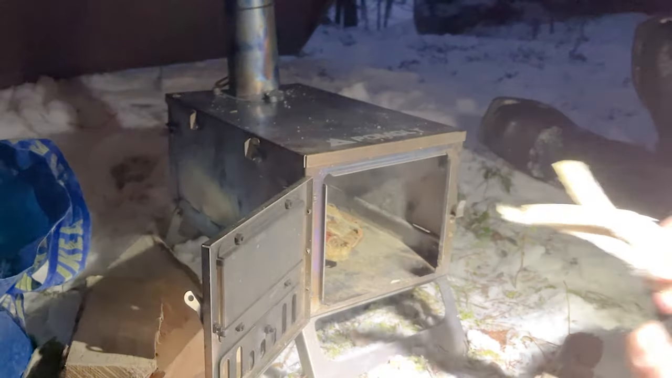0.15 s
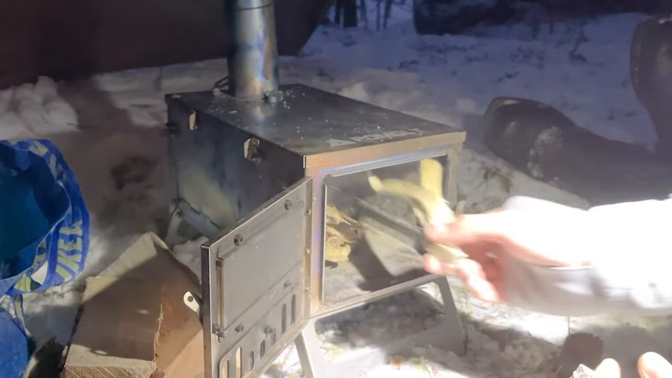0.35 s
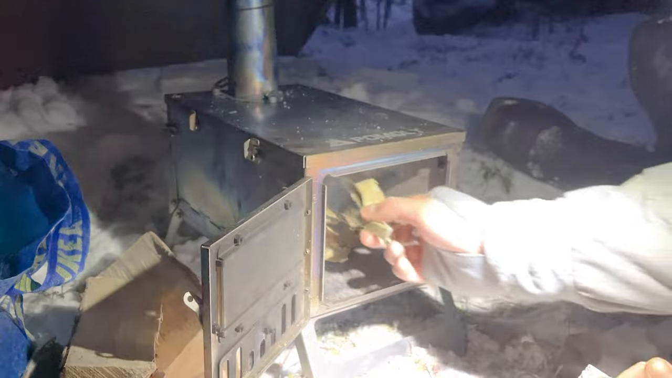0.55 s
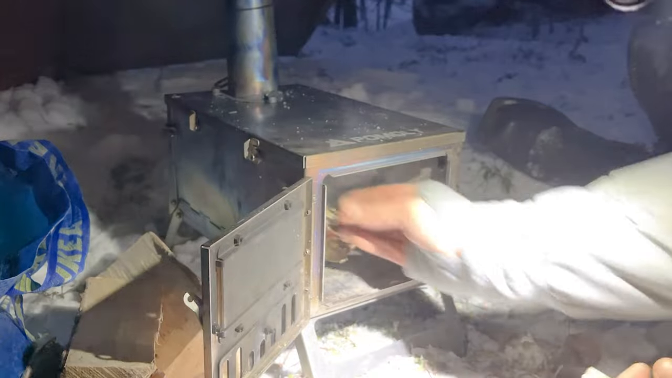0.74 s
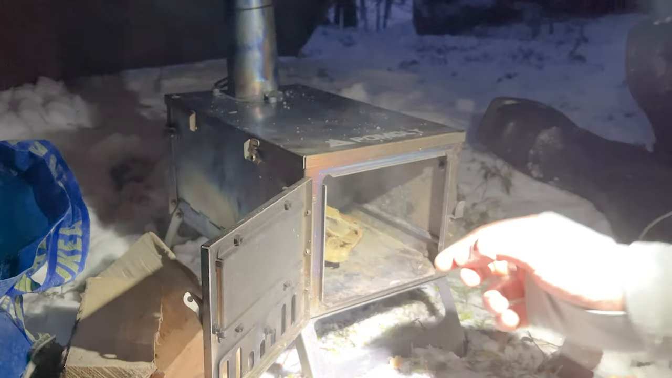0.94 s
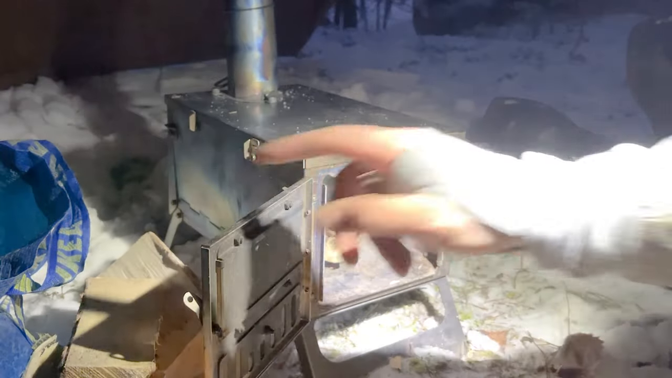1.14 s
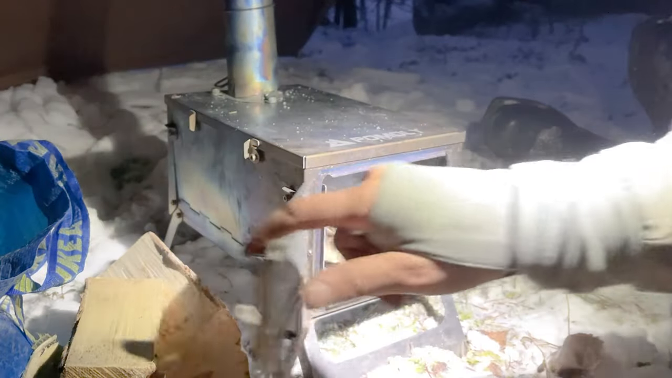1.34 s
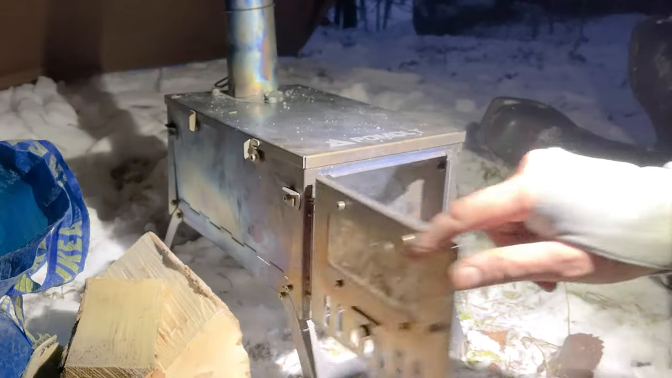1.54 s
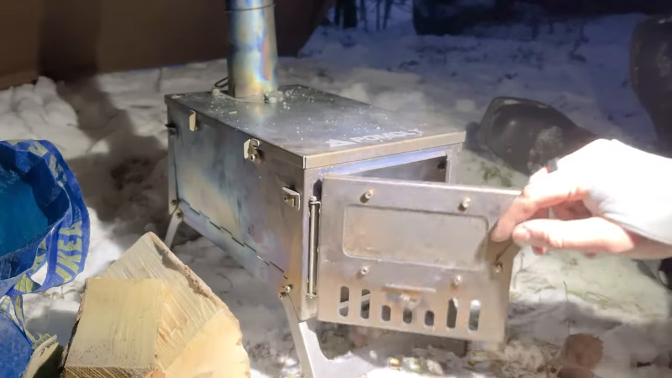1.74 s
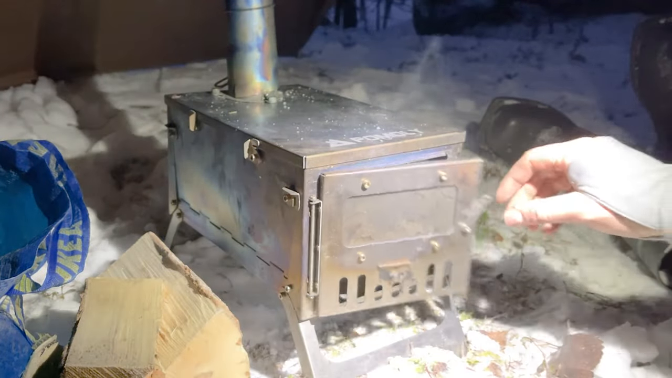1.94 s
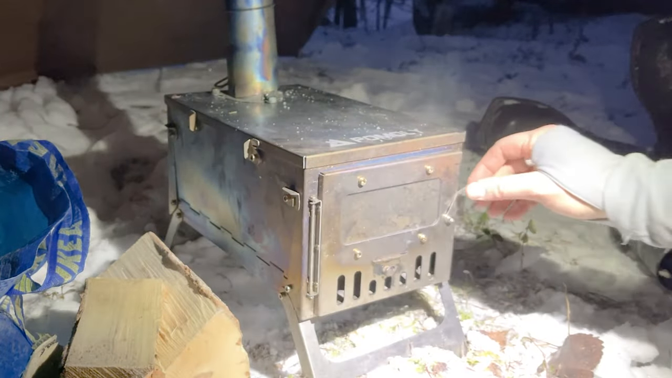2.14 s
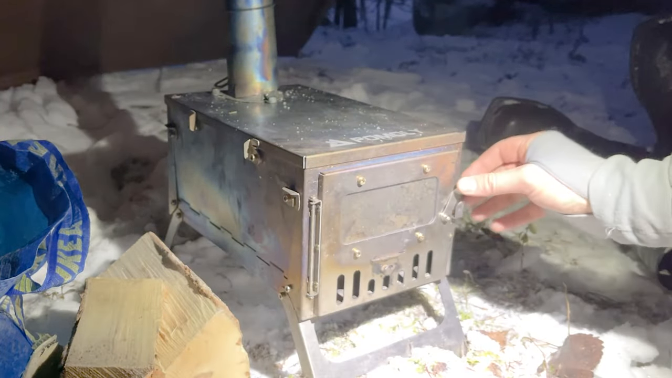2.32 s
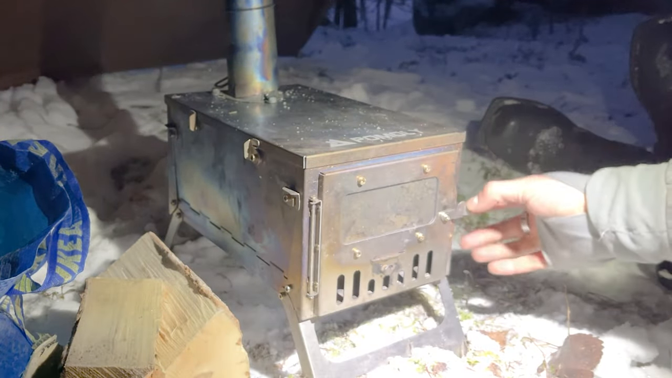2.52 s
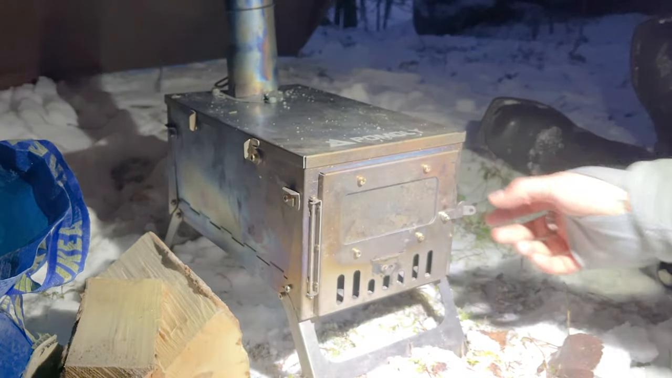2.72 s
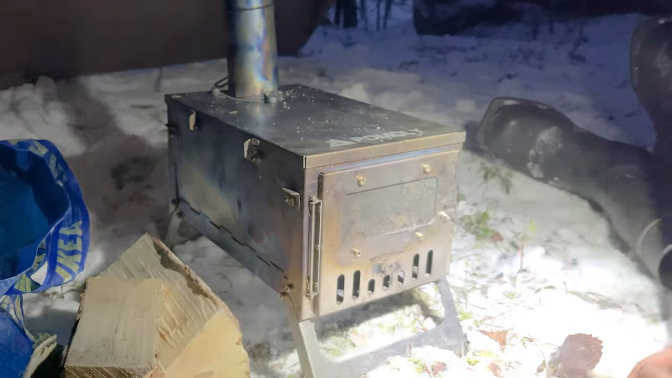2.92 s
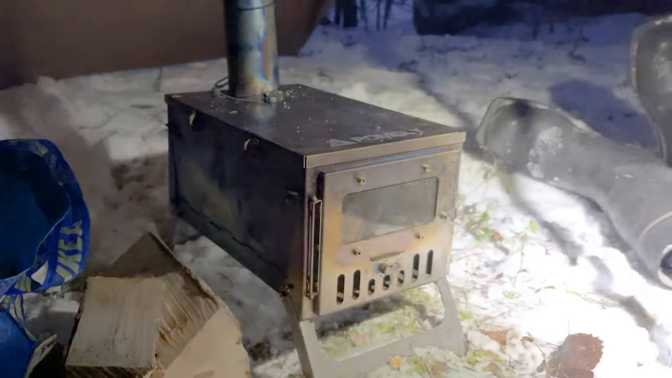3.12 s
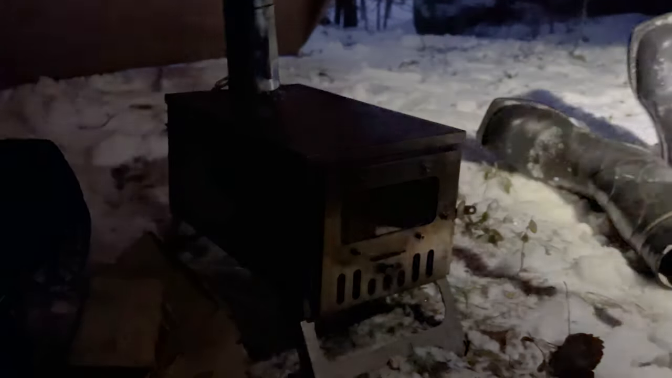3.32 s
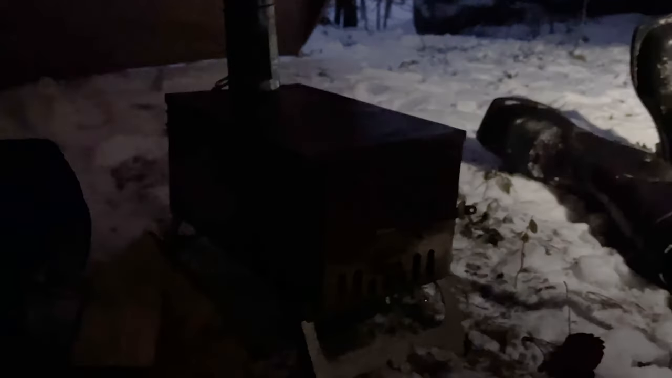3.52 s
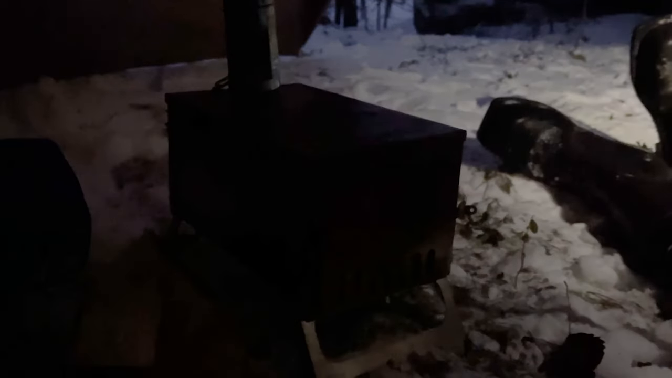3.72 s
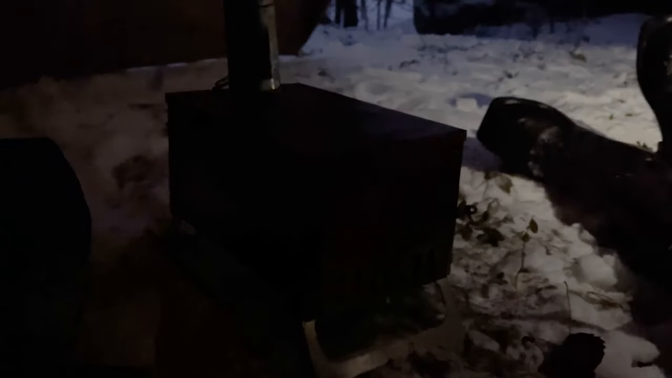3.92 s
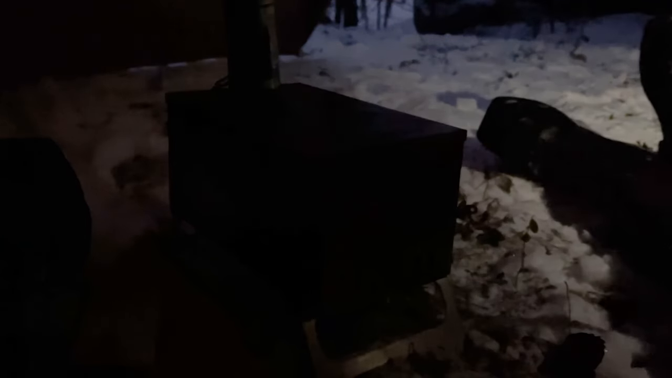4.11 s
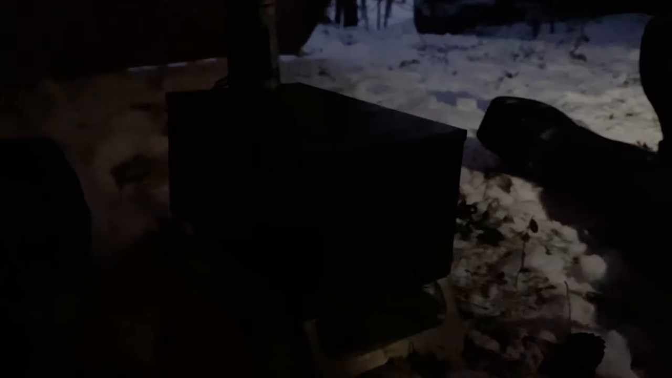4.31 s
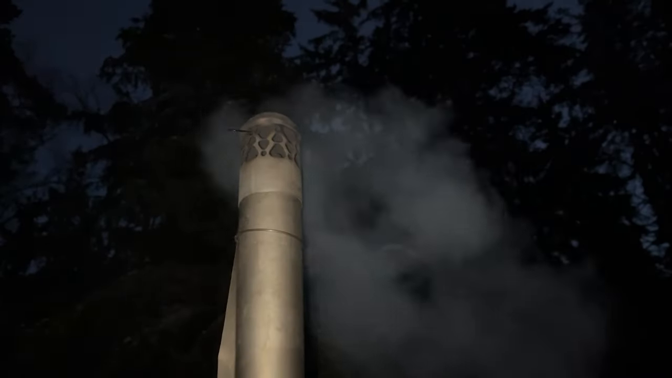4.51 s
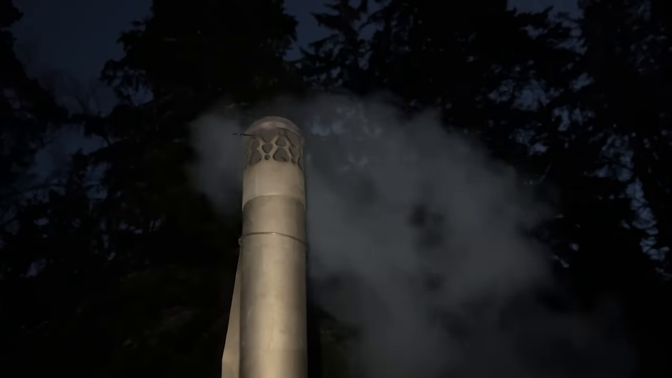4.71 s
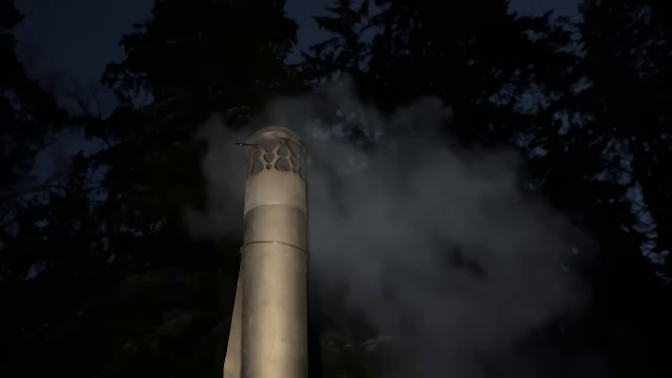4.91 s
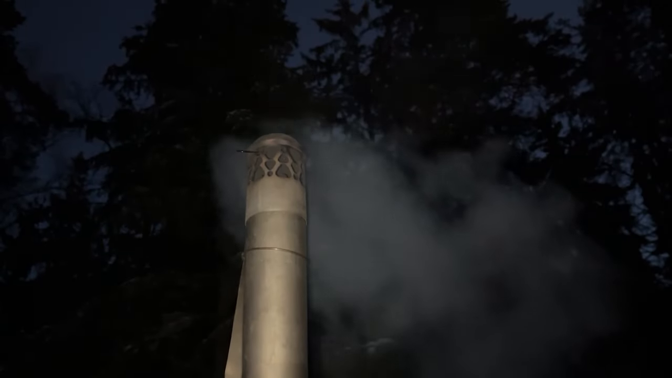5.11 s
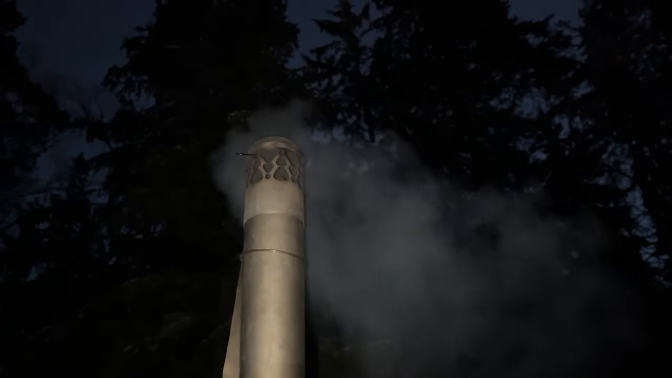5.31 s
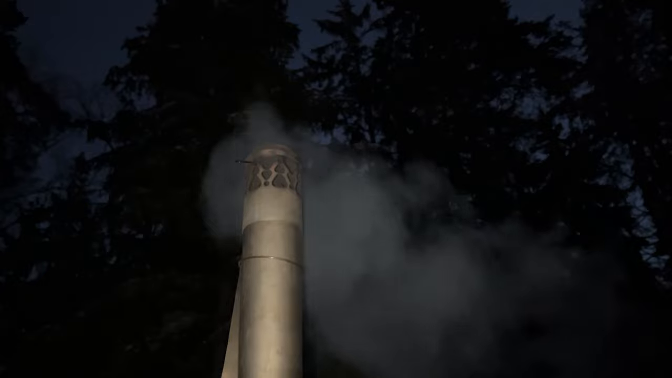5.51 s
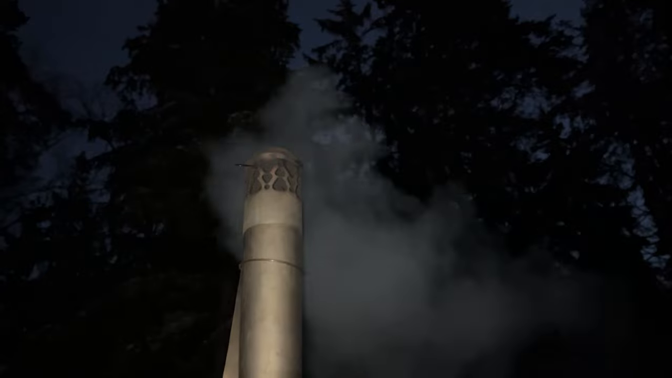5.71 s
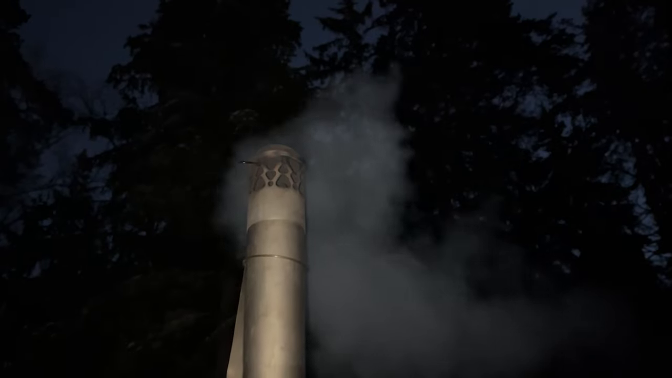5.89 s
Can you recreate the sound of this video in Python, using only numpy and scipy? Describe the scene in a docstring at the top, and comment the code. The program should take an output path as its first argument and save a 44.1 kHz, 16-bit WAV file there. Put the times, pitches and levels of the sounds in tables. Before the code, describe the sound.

Light wood knocks, a loud ringing thin-metal door slam with latch clanks, a dry crack, dull bumps, then low airy rumbling and faint pops.

```python
"""Inside a tent, then outdoors by the flue: a small sheet-steel stove heard on two close microphone ports.
Kindling lands in the firebox and the door is swung shut and latched: contact ticks, ringing steel modes, boom.
Squeaks, sleeves and scuffs are grainy shaped noise, wood snaps are noise bursts, soft thuds are falling chirps.
Behind them lie a faint hiss, a whistle and murmuring air; outdoors the flue rumbles as flickering noise,
the air buffets slowly and the fire pops twice."""
import sys
import numpy as np
from scipy import signal
from scipy.fft import rfft, irfft
from scipy.io import wavfile
from scipy.ndimage import uniform_filter1d

SR = 44100
rng = np.random.default_rng(int(sys.argv[2]) if len(sys.argv) > 2 else 0)


def master_out(mix):
    """Clip the mix to full scale and print it as 16-bit PCM to the path in sys.argv[1]."""
    frames = np.transpose(np.atleast_2d(mix))
    ceiling = np.clip(frames, -1, 1)
    pcm = np.round(ceiling * 32767).astype(np.int16)
    wavfile.write(sys.argv[1], SR, pcm)


N = 262395
TIME = np.arange(N) / SR  # s
HZ = np.fft.rfftfreq(N, 1 / SR)
RING = np.arange(SR // 3) / SR  # time within one short sound, s
SHARED_ONLY = np.array([[1], [0]])  # a long wave reaches the two ports alike: it has no unrelated part

# blows on door and latch: (time [s], clang [dB], panel boom [dB], time to the rebound [s])
DOOR_BLOWS = [(1.2399, -31.5, -32, 0.0097), (1.2581, -31.5, -31, .016), (1.281, -33, -40, .012),
              (1.709, -50.5, -42, .013), (1.728, -60.5, -38, .014), (1.804, -46, -57, 0.0057),
              (1.911, -47.5, -36, .014), (2.0387, -12.5, -19, .0163), (2.2196, -21, -21, 0.01),
              (2.4375, -31, -55, .0137), (2.445, -23, -22, .0066), (2.4988, -32.5, -30.5, 0.0056),
              (2.628, -63, -64, 0.0077)]
# steel sliding on steel at handle and latch:
# (start [s], length [s], clang [dB], boom [dB], treble corner [Hz])
SLIDES = [(1.261, .038, -53, -48, 8900), (1.30, .06, -66, -48.5, 1400), (1.918, .116, -44, -40.5, 2100),
          (2.427, .021, -46, -66, 13100)]
# ringing modes of the door: (frequency [Hz], level [dB], t60 [s])
DOOR_MODES = [(169, -15.5, .15), (197, -7.5, 0.17), (238.3, 0, 0.13), (293, 2.5, .14), (322, -7.5, 0.17),
              (378.2, -9.5, 0.18), (489.8, -17.5, 0.11), (545, -23.5, .18), (966, -13, 0.15),
              (1099, -10, .2), (1443, -13.5, .12), (1802, -8, 0.11), (1980, -14, .12), (2307, -5, 0.054),
              (2495, -12.5, .1), (2902, -12, .09), (3704, -15, .09), (4087, -1.5, 0.058),
              (4150, -5.5, 0.064), (4270, -5.5, .07), (6250, -4, 0.062), (7200, -9.5, 0.052),
              (8800, -5.5, .05), (12425, -5, 0.025)]
# kindling landing on the firebox floor: (time [s], clang [dB], panel boom [dB], treble corner [Hz])
WOOD_BLOWS = [(.088, -50.5, -68, 2030), (.145, -54, -59.5, 2170), (.374, -45.5, -42, 1630),
              (0.6345, -29.5, -28.5, 2780), (.746, -39.5, -31, 1530), (.765, -39, -32, 1800),
              (.785, -42, -34.5, 1660)]
# a stick touches with one end, lands, then tips over: (delay [s], clang change [dB], boom change [dB])
STICK_CONTACTS = [(-.0113, -12.5, -14), (0, 0.5, 0.5), (.027, -12.5, -16)]
# ringing modes of the firebox floor: (frequency [Hz], level [dB], t60 [s])
FLOOR_MODES = [(287.2, 4, 0.11), (334, 0, 0.097), (387.8, -6.5, 0.21), (472.3, -15, 0.21), (644, -22, 0.25),
               (874, -14.5, 0.28), (1095, -10.5, 0.12), (1238, -5.5, 0.08), (1429, -12, 0.26),
               (1770, -11.5, 0.19), (2120, -10, 0.12), (2325, -6, 0.12), (2780, -4, 0.074),
               (3230, 1.5, 0.085)]
# dense upper modes of the sheet steel: (frequency [Hz], relative density [dB per Hz])
SHEET_COLOUR = [(30, -25), (80, -4), (200, 1.5), (400, 3), (700, 0), (1100, 0), (2000, 3), (3500, 2),
                (5000, 2), (7000, 7), (12000, 8), (16000, -10.5)]
# how long those modes ring: (frequency [Hz], t60 [s])
SHEET_T60 = [(150, 0.23), (400, 0.19), (1040, 0.19), (2760, 0.11), (7280, 0.07), (14000, .06)]
# squeaks of hinge and latch: (peak time [s], low note [dB], high note [dB], rise [s], fall [s])
SQUEAKS = [(1.702, -68, -73, 0.01, 0.015), (1.803, -56.5, -61, 0.011, 0.0081),
           (2.634, -90, -68, 0.0045, 0.017)]
# their low note: (frequency [Hz], relative density [dB per Hz])
SQUEAK_LOW = [(1100, -42), (1500, 5), (1630, -12), (1800, 0), (2100, -25), (2450, -11), (3000, -38)]
# their high note: (frequency [Hz], relative density [dB per Hz])
SQUEAK_HIGH = [(3000, -42), (3500, -11), (3700, -2), (3950, -19), (4800, -32)]
# dry snaps of the wood, the last row the sharp crack of the first pop: (time [s], level [dB], t60 of the
# scatter [s])
SNAPS = [(2.820, -60, 0.045), (2.866, -63.5, 0.043), (2.9864, -45, 0.051), (3.5246, -30, 0.067),
         (4.869, -70, 0.027), (5.7882, -60, 0.019)]
# colour of a snap: (frequency [Hz], density [dB per Hz])
SNAP_COLOUR = [(100, -13), (700, -18.5), (1050, 2), (1450, 2.5), (2000, 2), (3500, 5.5), (5000, -1.5),
               (6500, -1), (9000, -2.5), (13000, -8), (16000, -27)]
# pops of the fire heard at the flue: (time [s], peak level [dB])
POPS = [(5.7861, -35), (5.864, -30)]
# colour of a pop before its shift in pitch: (frequency [Hz], relative level [dB])
POP_COLOUR = [(30, -14), (95, 10), (300, -0.5), (550, -2), (700, -8.5), (820, 0), (1150, 1.5),
              (1500, -15.5), (1750, -5.5), (2200, -20), (3000, -23), (5000, -44), (14000, -54)]
# dull thuds: (time [s], peak level [dB], pitch [Hz])
THUDS = [(1.240, -38, 165), (1.254, -38.5, 160), (2.896, -34.5, 293), (4.076, -32.5, 205),
         (4.110, -35.5, 196), (4.135, -40, 170), (4.183, -28, 181.7)]
# their shared colour, as it stands at a pitch of THUD_HZ: (frequency [Hz], relative level [dB])
THUD_COLOUR = [(12, -70), (45, -32), (100, -1.5), (190, 1.5), (300, -5), (450, -26), (560, -19.5),
               (800, -41), (1000, -34), (1500, -50), (4000, -53)]
# strokes of a sleeve: (peak time [s], rub [dB], sheen [dB], rise [s], fall [s])
SWISHES = [(.0076, -73, -44.5, 0.0022, 0.013), (.78, -56.5, -60, 0.1, 0.057),
           (1.24, -57, -59.5, 0.11, 0.14), (3.0, -58, -76, .07, 0.16), (3.30, -47, -52, .13, 0.04),
           (3.51, -51, -62, 0.093, 0.04)]
# low colour of rubbing cloth: (frequency [Hz], relative density [dB per Hz])
RUB = [(300, -28), (750, -10), (1050, 3), (1400, -1), (2500, 0.5), (4000, -0.5), (6500, -6.5), (9000, -16),
       (16000, -35.5)]
# high colour of rubbing cloth: (frequency [Hz], relative density [dB per Hz])
SHEEN = [(2000, -35), (7500, -16), (9500, 0.5), (12000, -2), (13500, -6.5), (16000, -18)]
# scuffs on the ground: (peak time [s], shuffle [dB], grit [dB], rise [s], fall [s])
SCUFFS = [(2.94, -56.5, -60, 0.029, 0.096), (3.245, -51.5, -74, 0.0073, .012),
          (3.317, -50.5, -35.5, 0.026, .014)]
# their soft colour: (frequency [Hz], relative density [dB per Hz])
SHUFFLE = [(60, -34), (200, 2.5), (380, -6.5), (600, -15), (2000, -37)]
# their gritty colour: (frequency [Hz], relative density [dB per Hz])
GRIT = [(200, -27), (400, -9), (800, -7), (1080, 5.5), (1350, -13), (1630, -5), (2100, -26), (6000, -13.5),
        (16000, -39)]
# draught in the flue, outdoors: (frequency [Hz], relative density [dB per Hz])
FLUE_COLOUR = [(20, -31.5), (40, -25), (65, -11), (110, -3.5), (250, 2.5), (450, -3), (650, -16),
               (1000, -22), (1700, -26), (2800, -37.5), (5500, -32.5), (8000, -44.5), (12000, -40.5),
               (14000, -51)]
# slow, deep buffeting of the outdoor air: (time [s], level [dB])
BUFFET_LEVEL = [(4.55, -80.5), (4.9, -64), (5.0, -55), (5.25, -60), (5.45, -57), (5.95, -56.5)]
# its colour: (frequency [Hz], relative density [dB per Hz])
BUFFET_COLOUR = [(25, -34), (65, -2), (110, -3), (200, -2.5), (500, -26), (2000, -64)]
# hiss in the tent, before its overall gain: (time [s], level [dB])
HISS_LEVEL = [(0.0, -62.5), (1.14, -76), (1.27, -67), (1.49, -73.5), (2.05, -72.5), (2.47, -86),
              (2.81, -81.5), (3.16, -65), (3.4, -64.5), (3.57, -74.5), (4.39, -72.5), (4.5, -71.5)]
# its colour: (frequency [Hz], relative density [dB per Hz])
HISS_COLOUR = [(200, -12), (750, -4), (1050, 2), (1450, -3), (1780, 6.5), (2050, -4), (2500, 1.5),
               (3900, 0.5), (5000, 0.5), (7000, -2), (9000, -3), (12000, -2.5), (14000, -11),
               (16000, -22.5)]
# faint whistle swelling and fading in the hiss: (peak time [s], level [dB], width [s])
WHISTLE_SWELL = (3.9, -73.5, .35)
# its narrow notes: (frequency [Hz], relative density [dB per Hz])
WHISTLE_NOTES = [(1500, -40), (1780, 0.5), (2050, -31), (2480, -6.5), (3100, -30), (4970, -9), (6500, -45)]
# low murmur of the air in the tent: (frequency [Hz], relative density [dB per Hz])
AIR_COLOUR = [(20, -33), (45, -18), (75, -1), (120, 0.5), (200, 0), (320, -4.5), (500, -13.5), (900, -20.5),
              (3000, -46)]
# how alike the two ports hear, before each layer's share: (frequency [Hz], correlation [-1 to 1])
LIKENESS = [(60, 1), (300, 0.94), (700, 0.68), (1100, 0.57), (1450, 0.23), (1900, .92), (3300, 0.64),
            (5000, 0.36), (6500, 0.28), (8000, 1), (10000, 0.85), (12000, 0.97), (16000, .8)]
# how far the left port leads: (frequency [Hz], phase [rad])
LEAD = [(20, 0), (2000, 0), (3400, .7), (5000, 0), (6000, -1.3), (7000, -1.7), (8000, -3.0), (8800, -3.3),
        (10000, -4.7), (11300, -6.0), (13000, -6.6), (14600, -9.0), (16000, -9.5)]
# further lead of the left port for sounds from the side: (frequency [Hz], phase [rad])
SIDEWAYS_LEAD = [(100, 0), (300, -0.4), (750, -2.5), (1050, -2), (1400, -3.5), (1800, 1.7), (3400, -0.13),
                 (5000, 0)]
# how much louder the left port is: (frequency [Hz], level difference [dB])
LEFT_DB = [(60, 0.5), (110, 0.5), (200, 0.5), (380, 0.5), (700, 0.0), (1290, 0.0), (2380, 1.0), (4400, 3.5),
           (8120, 0.5), (15000, 0.0)]

# contacts around each door blow: (clang [dB], boom [dB]) against the blow itself
GRAZE_DB, REBOUND_DB, SETTLE_DB = (-18.5, -28.5), (-14, -9), (-39, -20.5)
GRAZE_S, SETTLE_S = .004, 0.079  # graze before the blow, settling after it
# stronger blows are brighter: treble corner at a clang of 0 dB, and the drop in level that halves it
DOOR_CORNER_HZ, DULLER_DB_PER_OCTAVE = 21600, 44
BOOM_BELOW_HZ = 600  # modes below this belong to the boom, the others to the clang
THUD_HZ = 190
AIR_DB, FLUE_DB = -65.5, -57.5
OUTDOORS_S = 4.525  # middle of the change from tent to outdoors
DRIFT_DB, DRIFT_S, DRIFT_HZ = 1.5, .09, 170  # rms depth, length and width of wandering colour patches
EDGE_HZ = 16200  # recorder's upper band limit, also the span of the sheet modes


def door():
    """Each blow grazes, hits, rebounds and settles; sliding steel adds runs of small slips."""
    out, panel = np.zeros((2, N)), sheet()
    for s, clang_db, boom_db, rebound_s in DOOR_BLOWS:
        contacts = [(-GRAZE_S, GRAZE_DB), (0, (0, 0)), (rebound_s, REBOUND_DB), (SETTLE_S, SETTLE_DB)]
        for delay, (clang, boom) in contacts:
            corner_hz = DOOR_CORNER_HZ * 2 ** ((clang_db + clang) / DULLER_DB_PER_OCTAVE)
            add(out, s + delay, strike(DOOR_MODES, panel, clang_db + clang, boom_db + boom, corner_hz))
    for start, length, *slip in SLIDES:
        for s in start + length * uneven(count=14):
            gain = amp(rng.normal(-2, 2.5))
            sound = strike(DOOR_MODES, panel, *slip, ring_db=-5, sheet_db=-1, tick_db=1, detune=.06)
            add(out, s, gain * sound)
    return out


def kindling():
    """Sticks land on the firebox floor, each in a few quick contacts."""
    out, floor = np.zeros((2, N)), sheet()
    for s, clang_db, boom_db, corner_hz in WOOD_BLOWS:
        for delay, clang, boom in STICK_CONTACTS:
            sound = strike(FLOOR_MODES, floor, clang_db + clang, boom_db + boom, corner_hz, ring_db=-3,
                           sheet_db=7.0, tick_db=-5, swell_s=0.00537, spread_s=0.001, detune=0.037)
            add(out, s + delay, sound)
    return out


def sheet(count=340):
    """The crowded modes of a thin steel panel, one ring-down a row; the high ones die first."""
    hz = 60 + EDGE_HZ * uneven(count=count) ** 1.5
    size = amp(read(SHEET_COLOUR, hz)) * np.sqrt(np.gradient(hz))  # a wider gap gives a stronger mode
    size = size / np.linalg.norm(size)
    hz = hz[:, None]
    return size[:, None] * fade(RING, read(SHEET_T60, hz)) * np.exp(2j * np.pi * hz * RING)


def strike(modes, panel, clang_db, boom_db, corner_hz, ring_db=-8, sheet_db=-1, tick_db=3,
           tick_s=0.0015, swell_s=.009, spread_s=0.001, detune=0.015):
    """One blow: a tick, the clang of the steel, and the slower boom of the whole panel."""
    hz, db, t60 = np.transpose(modes)[:, :, None]
    low = hz[:, 0] < BOOM_BELOW_HZ
    rings = amp(db) * fade(RING, t60)
    # each spot on the panel drives the upper modes in its own way
    phase = rng.random((2, np.sum(~low), 1))  # cycles
    upper = (rings[~low] * np.sin(2 * np.pi * (hz[~low] * RING + phase))).sum(1)
    drive = rng.standard_normal((2, len(panel))) + 1j * rng.standard_normal((2, len(panel)))
    crowd = (drive @ panel).real
    tick = rng.standard_normal((2, len(RING))) * np.exp(-RING / tick_s)
    tick = signal.lfilter([1, -1], [1, -.75], tick)  # the small contact spot radiates little bass
    ringing = amp(ring_db) * upper + amp(sheet_db) * crowd
    clang = ringing * (1 - np.exp(-RING / spread_s)) + amp(tick_db) * tick
    # a soft striker stays in contact longer and gives less treble
    softness = signal.butter(3, min(corner_hz, SR / 2 - 500), fs=SR, output="sos")
    clang = signal.sosfilt(softness, clang)
    # the low modes build up over a few milliseconds; their pitches vary slightly from blow to blow
    varied_hz = hz[low] * (1 + detune * rng.uniform(-1, 1, (np.sum(low), 1)))
    lag = swell_s * rng.uniform(.9, 1.1, varied_hz.shape)
    boom = (rings[low] * np.sin(2 * np.pi * varied_hz * (RING - lag))).sum(0)
    boom = boom * (1 - np.exp(-(RING / swell_s) ** 2))
    return amp(clang_db) * clang + SHARED_ONLY * amp(boom_db) * boom


def squeaks():
    """Hinge and latch squeak faintly: grainy friction in a low and a high group of notes."""
    return rubbing(SQUEAKS, SQUEAK_LOW, SQUEAK_HIGH, grain_db=2.5)


def snaps(crack_db=3, crack_s=0.0013):
    """A fibre breaks, or a pop cracks: a sharp crack and a short scatter."""
    out = np.zeros((2, N))
    for s, db, t60 in SNAPS:
        shape = 1.16 * fade(RING, t60) + amp(crack_db) * np.exp(-RING / crack_s)
        add(out, s, amp(db) * rng.standard_normal((2, len(RING))) * shape)
    return coloured(out, SNAP_COLOUR)


def pops():
    """Pockets of gas burst in the fire and sound up the pipe."""
    out = np.zeros((2, N))
    for s, db in POPS:
        add(out, s, amp(db) * thump(POP_COLOUR, 0.97, lag_cycles=1.4, scatter=0.063, scatter_t60=0.027))
    return out


def thuds():
    """Soft, heavy bumps; one colour, shifted by the pitch of each."""
    out = np.zeros((2, N))
    for s, db, hz in THUDS:
        sound = thump(THUD_COLOUR, hz / THUD_HZ, lag_cycles=.9, scatter=0.024, scatter_t60=0.13)
        add(out, s, amp(db) * sound)
    return out


def thump(spectrum, scale, lag_cycles, scatter, scatter_t60):
    """One push, peak 1, in a given colour: its bass arrives late, a falling chirp, with a weak scatter."""
    hz = abs(np.fft.fftfreq(len(RING), 1 / SR))
    log_size = np.log(amp(read(spectrum, hz / scale)))
    minimum_phase = np.conj(signal.hilbert(log_size))  # the promptest response of this colour
    response = np.exp(minimum_phase - 2j * np.pi * lag_cycles * np.log(hz + 20))
    scattered = scatter * rng.standard_normal((2, len(RING))) * fade(RING, scatter_t60)
    push = SHARED_ONLY * (RING == 0) + scattered
    sound = irfft(rfft(push) * response[:len(RING) // 2 + 1])
    return sound / abs(sound).max()


def sleeves():
    """Cloth rubs on cloth: grainy strokes with a low rub and a high sheen."""
    return rubbing(SWISHES, RUB, SHEEN, grain_db=1.0)


def scuffs():
    """The ground is scuffed: grainy friction, part soft shuffle and part grit."""
    return rubbing(SCUFFS, SHUFFLE, GRIT, grain_db=2.5)


def rubbing(strokes, low, high, grain_db):
    """Grainy friction in a low and a high colour; each stroke swells to its peak and dies away."""
    s, low_db, high_db, rise, fall = np.transpose(strokes)
    after = TIME[:, None] - s
    swell = np.exp(np.minimum(after / rise, -after / fall))
    grain = unit(amp(flickering(grain_db, size=90)))
    return grain * (swell @ amp(low_db) * noise(low) + swell @ amp(high_db) * noise(high))


def flue(flutter_db=1.4):
    """The draught rumbles unevenly up the pipe, over a deep buffeting of the air."""
    flutter = amp(flickering(flutter_db, size=1200))
    rumble = amp(FLUE_DB) * flutter * noise(FLUE_COLOUR)
    return rumble + level(BUFFET_LEVEL) * noise(BUFFET_COLOUR)


def tent(hiss_db=3, flicker_db=1):
    """A faint, slightly flickering hiss over the murmur of the air."""
    flicker = amp(flickering(flicker_db, size=300))
    hiss = amp(hiss_db) * level(HISS_LEVEL) * flicker * drifting(noise(HISS_COLOUR))
    return hiss + amp(AIR_DB) * noise(AIR_COLOUR)


def whistle():
    """Narrow, airy notes swell and fade once, their colour wandering."""
    s, db, width = WHISTLE_SWELL
    return amp(db) * np.exp(-((TIME - s) / width) ** 2) * drifting(noise(WHISTLE_NOTES))


def drifting(x):
    """Lets the colour of a noise wander in random patches."""
    hz, t, z = signal.stft(x, SR, nperseg=1024)
    patches = rng.standard_normal(z.shape[1:])
    for axis, span in enumerate([DRIFT_HZ / hz[1], DRIFT_S / t[1]]):
        patches = uniform_filter1d(patches, size=max(round(span), 1), axis=axis)
    wandered = signal.istft(z * amp(DRIFT_DB * unit(patches)), SR, nperseg=1024)[1]
    return unit(wandered[:, :N])


def flickering(rms_db, size):
    """A random wander in decibels, smoothed over a number of samples."""
    return rms_db * unit(uniform_filter1d(rng.standard_normal(N), size=size))


def noise(spectrum):
    """Two unrelated noises of one colour, at an rms of one."""
    return unit(coloured(rng.standard_normal((2, N)), spectrum))


def coloured(x, spectrum):
    """Gives a sound a spectrum."""
    size = x.shape[-1]
    return irfft(rfft(x) * amp(read(spectrum, np.fft.rfftfreq(size, 1 / SR))), size)


def amp(db):
    """Decibels to gain."""
    return 10 ** (np.asarray(db) / 20)


def unit(x):
    """Scales to an rms of one."""
    return x / np.sqrt(np.mean(x ** 2) + 1e-20)


def read(points, hz):
    """Reads a table along a logarithmic frequency axis."""
    f, value = np.transpose(points)
    return np.interp(np.log(hz + 1), np.log(f + 1), value)


def level(curve):
    """A gain for every sample from rows of (time [s], level [dB])."""
    return amp(np.interp(TIME, *np.transpose(curve)))


def fade(t, t60):
    """Exponential ring-down by 60 dB in t60 seconds."""
    return np.exp(-np.log(1000) * t / t60)


def uneven(count):
    """Unevenly spaced points from 0 to 1."""
    return (np.arange(count) + rng.random(count)) / count


def add(mix, s, sound):
    """Mixes a sound in at a time in seconds."""
    part = mix[:, max(round(s * SR), 0):][:, :sound.shape[-1]]
    part += sound[..., :part.shape[1]]


def ports(pair, share=1, lead=0):
    """Turns a shared signal and an unrelated one into what the two close ports pick up."""
    shared, unrelated = rfft(pair)
    same = np.clip(read(LIKENESS, HZ) * share, -1, 1)
    right = same * shared + np.sqrt(1 - same ** 2) * unrelated
    right = right * np.exp(-1j * (read(LEAD, HZ) + lead))
    return irfft(np.array([shared, right]), N)


def scene():
    """The stove up close, with the tent around it first, then the flue from outside."""
    outdoors = np.clip((TIME - OUTDOORS_S) / 0.013 + .5, 0, 1)  # 13 ms crossfade of the background
    ahead = ports(door() + kindling() + squeaks() + thuds() + pops())
    aside = ports(snaps() + sleeves() + scuffs(), lead=read(SIDEWAYS_LEAD, HZ))
    inside = ports(tent() + whistle(), share=.9)
    outside = ports(flue(), share=0.64)
    around = (1 - outdoors) * inside + outdoors * outside
    balance = amp(read(LEFT_DB, HZ) * np.array([[.5], [-.5]]))  # half up on the left, half down on the right
    return irfft(rfft(ahead + aside + around) * balance, N)


def record(dry, low_cut_hz=55):
    """The microphone's low cut and the recorder's band limit."""
    low_cut = signal.butter(2, low_cut_hz, "high", fs=SR, output="sos")
    lean = signal.sosfilt(low_cut, dry)
    band_limit = signal.firwin(401, EDGE_HZ, window=("kaiser", 9), fs=SR)
    return signal.oaconvolve(lean, band_limit[None], "same")


dry = scene()
out = record(dry)
master_out(out)
```